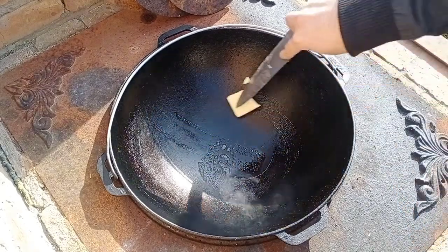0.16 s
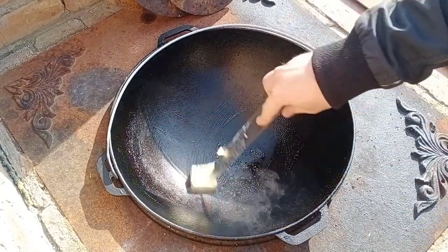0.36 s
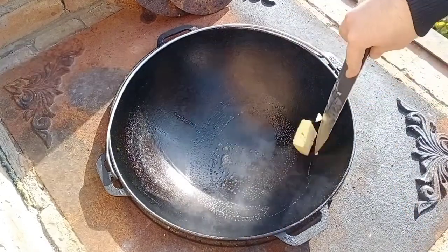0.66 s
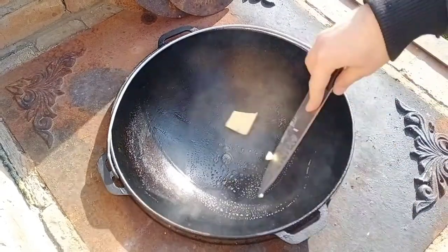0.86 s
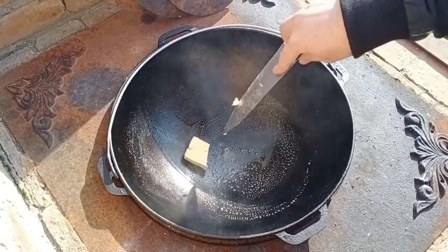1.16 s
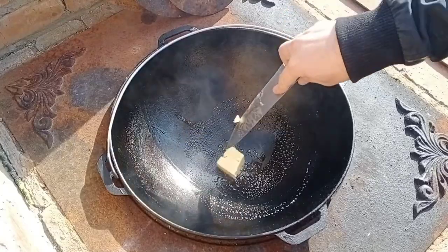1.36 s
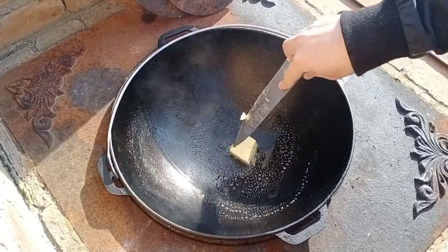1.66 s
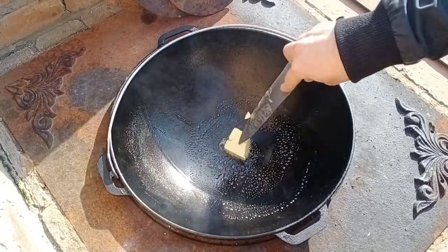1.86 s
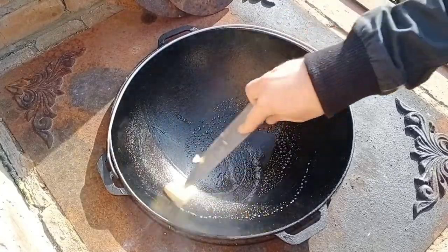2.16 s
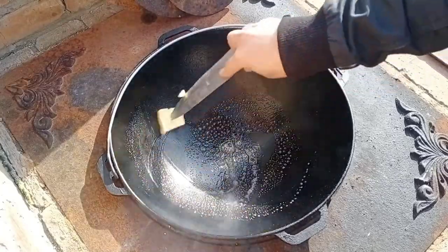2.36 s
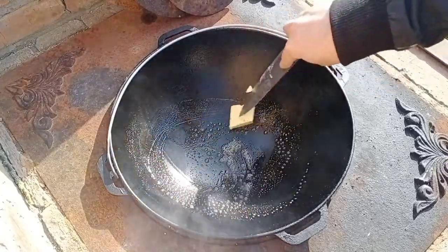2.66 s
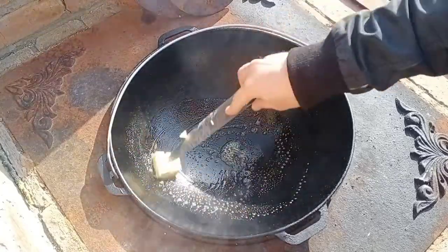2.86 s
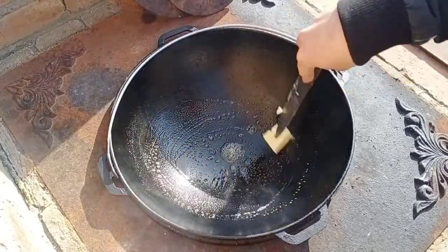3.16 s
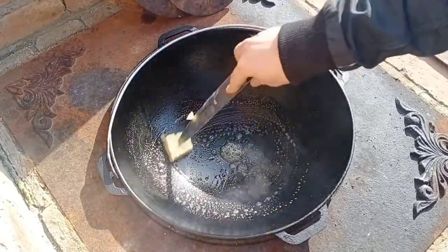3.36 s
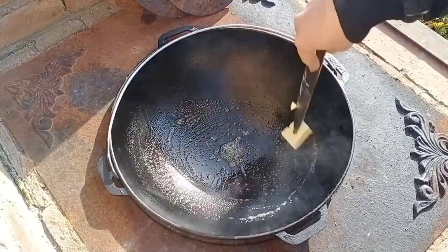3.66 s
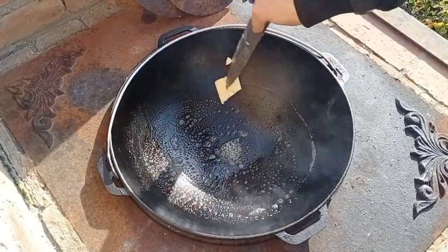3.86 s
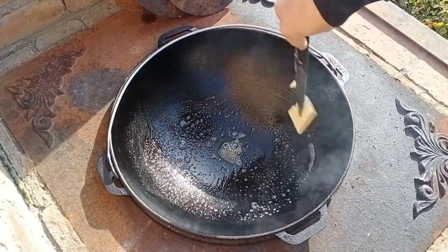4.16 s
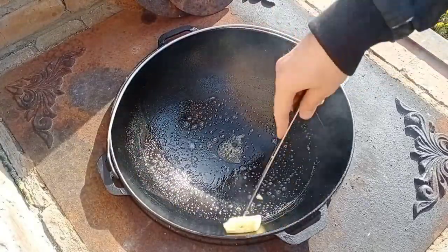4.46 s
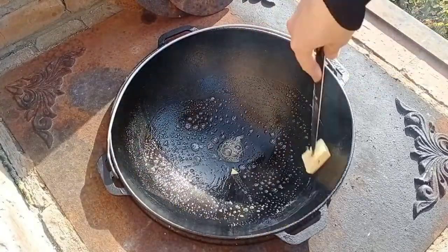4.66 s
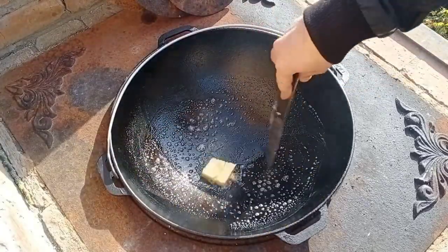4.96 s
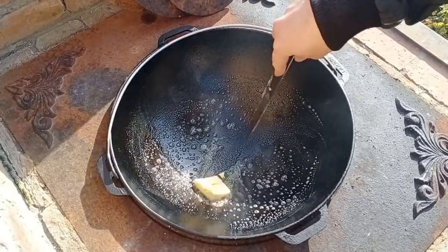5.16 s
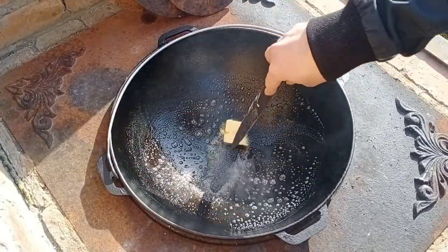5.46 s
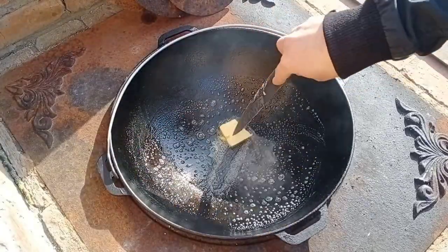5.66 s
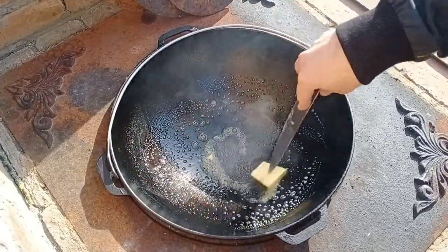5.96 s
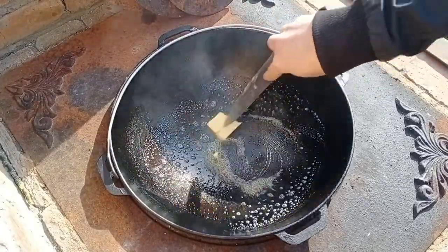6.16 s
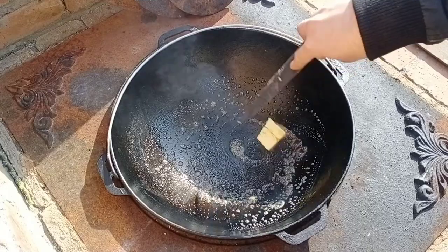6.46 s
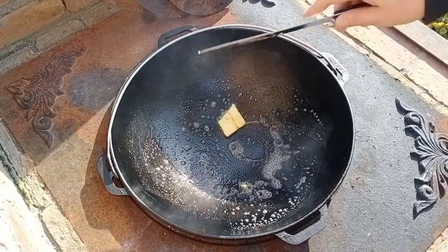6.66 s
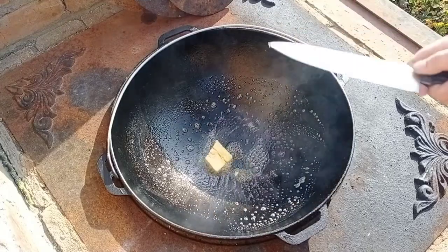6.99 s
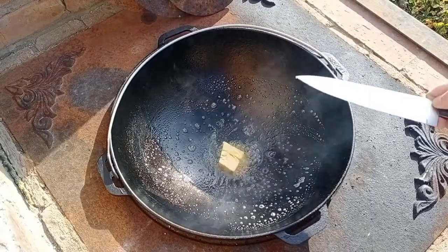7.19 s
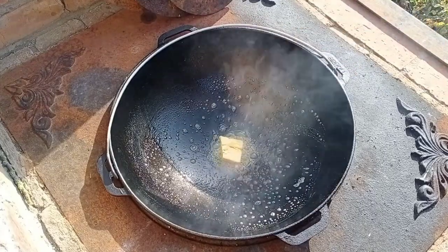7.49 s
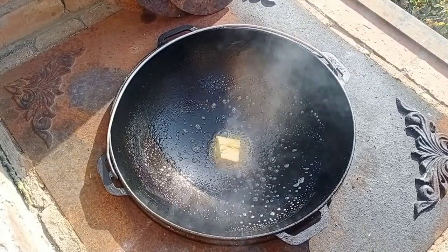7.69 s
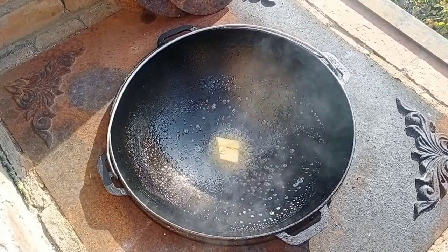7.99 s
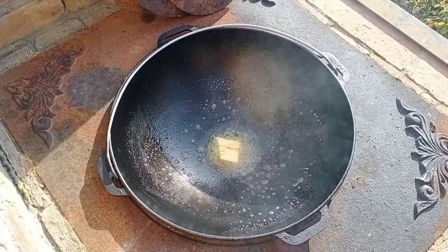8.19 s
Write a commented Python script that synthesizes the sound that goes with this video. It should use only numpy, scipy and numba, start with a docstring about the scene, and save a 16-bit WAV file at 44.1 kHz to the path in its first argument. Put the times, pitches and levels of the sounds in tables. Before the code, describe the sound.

Butter fizzes and spits sharply in a hot iron pot outdoors, flaring as a knife drags it, with light wind bumping the microphone.

```python
"""Outdoors, a slab of butter is pushed round a hot iron pot with a knife, close to a phone microphone.
Water in the butter boils off: a fizz of tiny random bursts and hiss, with louder spits made from clicks.
All but the deepest bubbling passes through echoes and resonances that stand for the bowl, or a colour filter.
The knife strikes the iron twice (noise driving ringing modes) and dragging makes the pot hum.
Filtered noise makes the wind that murmurs and thuds on the microphone, and a faint steady background.
"""
import sys
import numpy as np
from scipy import signal
from scipy.fft import rfft, irfft
from scipy.io import wavfile
from scipy.ndimage import uniform_filter1d
from numba import njit

SR = 44100
rng = np.random.default_rng(int(sys.argv[2]) if len(sys.argv) > 2 else 0)


def wav_out(sig):
    """Save sig, one row per channel (or a flat mono array), as 16-bit PCM at SR to the path in sys.argv[1]."""
    wavfile.write(sys.argv[1], SR, np.round(np.clip(np.atleast_2d(sig).T, -1, 1) * 32767).astype(np.int16))


N = 367353

# Tone of the faint outdoor background: (frequency [Hz], gain [dB])
AIR_TONE = [(18, -18), (30, 18), (108, -6), (591, -13.5), (785, 6), (1200, -23), (1300, 12), (1690, -23),
            (2860, -120)]
AIR_LEVEL_DB = -78

# Tone of the wind on the microphone: (frequency [Hz], gain [dB])
WIND_TONE = [(15, -9), (25, 1.5), (108, 5.5), (160, -4), (237, -9.5), (296, -20), (400, -32), (520, -65),
             (880, -120)]
# Murmur of the wind: (time [s], level [dB])
BREEZE = [(0, -74), (.47, -85), (.62, -63), (.85, -69), (1.02, -71), (1.2, -74), (1.65, -83), (1.8, -68.5),
          (2.5, -68.5), (3.2, -76), (3.65, -64.5), (4.0, -77), (4.44, -66.5), (4.75, -77), (5.0, -82),
          (5.12, -66), (5.6, -83), (6.5, -68.5), (7.5, -80), (8.33, -69)]
# Gusts that thud on the microphone: (time [s], level before the soft start [dB])
THUDS = [(2.164, -33.5), (2.8, -61), (4.396, -58), (5.753, -41), (5.883, -42.5), (6.079, -47.5),
         (6.288, -31), (6.577, -48), (6.673, -35), (6.72, -32.5), (7.234, -50.5), (8.09, -32), (8.199, -42)]
THUD_T60_S = 0.17  # time for a thud to die by 60 dB

# Low resonances of the pot: (frequency [Hz], width [Hz])
POT_HUM = [(425, 55), (730, 110), (1080, 86)]
# Levels of the two upper ones: (time [s], middle level [dB], top level [dB])
UPPER_HUM = [(0, -74, -70), (.5, -76, -70), (.65, -101, -57.5), (1.0, -77, -56.5), (1.3, -80, -73),
             (1.8, -78, -70), (2.3, -78, -66), (2.6, -83, -84.5), (3.4, -83, -76), (4.0, -79, -79),
             (4.44, -73, -83), (4.9, -79.5, -86), (5.6, -74.5, -88), (6.3, -84, -83), (6.54, -77, -68),
             (6.97, -65, -80), (7.1, -84.5, -83.5), (8.33, -87, -82.5)]
LOW_HUM_DB, LOW_HUM_SLOPE = -63, 1.33  # lowest one at the hardest boil; dB per dB of big bubbles

# Knife on iron: (time [s], ring [dB], skid length [s], brightness [dB per octave],
# thud [dB], thud pitch [Hz], knock [dB]); levels apply before the filters
STRIKES = [(0.904, -25.5, 0.0062, -5, -22.5, 134.6, -15), (5.066, -18, 0.059, 15, -28.5, 158.3, -42)]
# Ringing modes of the iron: (frequency [Hz], drive [dB], time to die by 60 dB [s])
IRON_MODES = [(2310, -21.5, 0.038), (2670, -8.5, 0.089), (3090, -3, 0.15), (3240, -7.5, 0.12),
              (3304, 3.5, 0.13), (3410, 6.5, 0.062), (3570, -8.5, .07), (3800, -6, 0.029),
              (3800, -12, 0.043), (4050, 5, 0.056), (4150, 4.5, 0.042), (4820, -6.5, 0.035),
              (4870, -13, .05), (5100, -3, 0.054), (5600, -4.5, 0.055), (6140, -24, .05)]

# Tone of bowl and microphone together: (frequency [Hz], gain [dB])
BOWL_TONE = [(530, -68.5), (950, -71.5), (1200, -24.5), (1480, -7), (1900, -11), (2300, -11.5), (3300, -4),
             (4380, -1), (5700, 0), (7140, -11.5), (9300, -29.5), (10300, -27.5), (11600, -27),
             (13500, -14), (15600, -12.5)]
# Echoes in the bowl: (delay [s], level [dB])
BOWL_ECHOES = [(.0011, -34.5), (.0027, -26.5), (.0043, -14.5), (.0068, -23)]
# Air resonances of the bowl: (frequency [Hz], width [Hz], level against the sound that drives them [dB])
BOWL_AIR = [(1620, 97, -16), (2580, 315, -1.5), (3190, 110, -3), (4110, 360, -3.5), (5540, 300, -7.5),
            (6640, 170, -12), (10100, 120, -8)]

# Loud single spits: (time [s], peak [dB], spray above peak [dB], thump above peak [dB])
SPITS = [(0.125, -20, -22, -20.5), (0.2254, -16, -13.5, -42), (0.385, -20, -27, -45), (0.6, -16, -19, -34),
         (0.7679, -19.5, -4.5, -31), (0.84, -19, -19, -24), (1.491, -18.5, -12, -33),
         (1.5457, -13.5, -18, -30), (1.668, -17.5, -13, -26), (1.8192, -12, -22, -32),
         (1.8519, -18.5, -16, -26), (1.9998, -22, -18, -30), (2.604, -15.5, -33, -27),
         (3.2857, -19.5, -10, -39), (3.3116, -21, -8, -30), (3.3518, -23, -5, -19.5),
         (3.496, -20.5, -11, -48), (3.6897, -13.5, -21, -33), (3.8689, -16.5, -22.5, -49),
         (4.594, -24.5, -13, -39), (4.8641, -21, -12, -42), (5.238, -16, -25, -37), (5.3596, -16, -17, -36),
         (5.455, -13.5, -19, -26), (5.5318, -14.5, -18, -22), (5.7021, -15, -23, -25),
         (6.094, -17.5, -15, -41), (6.1716, -18, -7.5, -26.5), (6.216, -16.5, -25, -36),
         (6.27, -18, -14, -27), (6.548, -10.5, -27, -28.5), (6.6146, -11, -15, -25.5),
         (6.7315, -13, -11, -36), (6.7755, -19, -13, -45), (7.111, -19.5, -25, -36),
         (7.1688, -16, -28, -42), (7.2406, -16.5, -18, -27), (7.4328, -18.5, -10, -33),
         (7.4576, -12, -19, -14), (7.5553, -22, -24, -25), (7.742, -17.5, -33, -31), (7.856, -22, -16, -45),
         (8.1874, -26.5, -36, -41), (8.2298, -23.5, -29, -39)]
SPIT_MAKEUP_DB = 8.7, 29.4, 38.1, 27  # makes up for filter loss in body, spray, thump and deep part
SPLIT_HZ = 2000, 9300  # borders between big bubbles, fizz and spray

# Gentle boil between the flares: (time [s], fizz [dB], fine spray [dB], big bubbles [dB])
SIMMER = [(0, -50, -53, -64), (.9, -56, -52, -60.5), (1.3, -57, -55, -66.5), (2.0, -51, -50, -62),
          (2.75, -45.5, -43.5, -64), (3.95, -48, -50, -67), (4.5, -52.5, -48.5, -63), (4.9, -50, -50, -68),
          (5.9, -53.5, -60, -74), (7.0, -45, -48, -56.5), (7.85, -47.5, -55, -62),
          (8.03, -56.5, -59.5, -67.5), (8.33, -53, -59, -83)]
# The slab slides onto fresh hot iron and the boil flares:
# (start [s], rise [s], hold [s], fizz [dB], fine spray [dB], big bubbles [dB])
FLARES = [(-.1, .1, .04, -35.5, -36.5, -50), (0.399, .14, 0.027, -38, -38.5, -49),
          (1.33, 0.26, 0.093, -40, -43, -53), (2.141, .11, 0.093, -35, -34, -46),
          (3.0, .15, .04, -38.5, -35, -50.5), (3.5, .11, 0.041, -38, -34, -49.5),
          (4.168, 0.043, 0.0091, -48, -48, -64), (5.04, .04, 0.039, -38, -36, -51),
          (5.14, .1, .42, -33.5, -35, -50), (6.023, .1, .15, -42, -44, -58.5),
          (6.3, .2, .08, -38, -34.5, -52), (6.671, .06, .08, -40, -37.5, -53.5)]
RISE_DB = 16  # climb of a flare over its rise time
FALL_DB_PER_S = 40, 36, 44.5  # how fast fizz, spray and big bubbles die down
# Brief dips in the level of the fizz, spray and big bubbles: (time [s], length [s], level change [dB])
DIPS = [(3.274, 0.037, -9), (3.335, .014, -7), (6.624, .05, -5)]

MIC_TOP_HZ = 15900  # the top is cut above this


def undb(db):
    """Decibels to a plain factor."""
    return 10 ** (np.asarray(db) / 20)


def unit(x):
    """Scale to an average (RMS) strength of 1."""
    return x / np.sqrt(np.mean(x ** 2))


def curves(table):
    """Columns of a table joined by straight lines in time."""
    s, *columns = np.transpose(table)
    return [np.interp(np.arange(N) / SR, s, column) for column in columns]


def colour(x, points, size=2048):
    """Tone filter through (Hz, dB) points that never sounds ahead of its input."""
    hz, db = np.transpose(points)
    bins_hz = np.arange(size // 2 + 1) * SR / size
    log_gain = np.interp(np.log(bins_hz + 1), np.log(hz), db) * np.log(10) / 20
    cepstrum = irfft(log_gain)
    # folding the second half onto the first makes the filter minimum-phase
    cepstrum[1:size // 2] *= 2
    cepstrum[size // 2 + 1:] = 0
    impulse = irfft(np.exp(rfft(cepstrum)))
    return signal.fftconvolve(x, impulse)[:N]


def band(x, lo_hz, hi_hz):
    """Keep mainly the sound between two frequencies."""
    return signal.sosfilt(signal.butter(2, [lo_hz, hi_hz], "band", fs=SR, output="sos"), x)


def ring(x, hz, t60):
    """One mode: a decaying rotation driven by x; its real part is in step with x at resonance."""
    pole = np.exp(2j * np.pi * hz / SR - np.log(1000) / (t60 * SR))
    return signal.lfilter([1], [1, -pole], x)


def width_to_t60(width):
    """A narrower resonance [Hz] rings longer [s]."""
    return np.log(1000) / np.pi / width


def walk(rate):
    """Random levels, a new one every 1 / rate seconds, smoothed twice; RMS strength 1."""
    k = int(SR / rate)
    steps = np.repeat(rng.standard_normal(N // k + 1), k)
    smooth = uniform_filter1d(uniform_filter1d(steps, k), k)
    return unit(smooth[:N])


@njit
def follow(x, attack, release):
    """Envelope that rises fast and falls slowly."""
    e, out = 0., np.empty(len(x))
    for i in range(len(x)):
        e += (x[i] - e) * (attack if x[i] > e else release)
        out[i] = e
    return out


def split(x):
    """Low, middle and high parts that add up to x."""
    low, below_high = (signal.sosfiltfilt(signal.butter(2, hz, fs=SR, output="sos"), x) for hz in SPLIT_HZ)
    return low, below_high - low, x - below_high


def air():
    """Faint steady outdoor background: noise with a fixed tone."""
    return undb(AIR_LEVEL_DB) * unit(colour(rng.standard_normal(N), AIR_TONE, size=8192))


def wind():
    """Wind murmurs on the microphone and thuds in gusts: one low noise with a changing level."""
    t = np.arange(N) / SR
    level = undb(curves(BREEZE)[0] + 6.2 * walk(26.0))
    for s, db in THUDS:
        age = np.maximum(t - s, 0)
        soft_start = 1 - np.exp(-age / 0.013)
        level = level + soft_start * undb(db - 60 * age / THUD_T60_S)
    return level * unit(colour(rng.standard_normal(N), WIND_TONE, size=8192))


def drag(big_db):
    """Dragging rumbles the pot's low resonances; the lowest follows the level of the big bubbles."""
    low_db = LOW_HUM_DB + LOW_HUM_SLOPE * (big_db - big_db.max())
    judder_db = 4.5  # random wavering of each level
    rumble = 0
    for (hz, width), db in zip(POT_HUM, [low_db, *curves(UPPER_HUM)]):
        hum = ring(rng.standard_normal(N), hz, width_to_t60(width)).imag
        rumble = rumble + undb(db + judder_db * walk(12.)) * unit(hum)
    return rumble


def knife():
    """The edge strikes or skids: it knocks, rings the iron and grates; the pot thuds on its stand."""
    t, out = np.arange(N) / SR, 0
    for s, ring_db, skid_s, bright_db, thud_db, thud_hz, knock_db in STRIKES:
        age = np.maximum(t - s, 0)

        def noise_with(fade):
            return (t >= s) * fade * rng.standard_normal(N)

        skid = noise_with(np.exp(-(age / skid_s) ** 2)) / np.sqrt(skid_s * SR)
        middle_hz = IRON_MODES[5][0]  # brightness tilts the modes around this pitch
        iron = sum(undb(db + bright_db * np.log2(hz / middle_hz)) * ring(skid, hz, t60).imag
                   for hz, db, t60 in IRON_MODES)
        grating = undb(38.5) * colour(skid, BOWL_TONE)
        out = out + undb(ring_db) * band(iron + grating, 1880.0, 4840.0)

        shove = age / 0.00095 * np.exp(-age / 0.00055) / (0.00095 * SR)
        thud = ring(shove, thud_hz, 0.12) + undb(0.5) * ring(shove, POT_HUM[0][0], 0.15)
        out = out + undb(thud_db) * band(thud.imag, 100.0, 700.)

        knock = noise_with(np.exp(-age / 0.0043))
        out = out + undb(knock_db) * band(knock, 470.0, 1900.0)

        shudder = noise_with(undb(-60 * age / 0.39))  # the pot shakes on its stand
        out = out + undb(thud_db + 5.0) * band(shudder, 0.64 * thud_hz, 1.58 * thud_hz)

        rattle = noise_with(np.exp(-age / 0.021))  # modes too close to tell apart
        rattle = band(band(rattle, 3000.0, 4360.0), 3000.0, 4360.0)
        out = out + undb(ring_db + 5.5 - 0.55 * bright_db) * rattle
    return out


def bowl(x):
    """Direct sound, a few echoes off the curved iron and the air ringing in it."""
    echoed = x.copy()
    for s, db in BOWL_ECHOES:
        delay = int(s * SR)
        echoed[delay:] += undb(db) * x[:-delay]
    out = echoed
    for hz, width, db in BOWL_AIR:
        even_out = 2 * np.pi * width / SR  # cancels the build-up at resonance
        out = out + undb(db) * even_out * ring(echoed, hz, width_to_t60(width)).real
    return out


def sputter(clicks, tail_s, tail_db):
    """Each click is followed by a noisy swell of after-bursts that dies away."""
    fade = np.exp(-1 / (tail_s * SR))
    swell = signal.lfilter([np.e * (1 - fade)], np.convolve([1, -fade], [1, -fade]), np.abs(clicks))
    return clicks + undb(tail_db) * swell * rng.standard_normal(N)


def spits():
    """Each spit is a sharp click and a sputter, with its own share of spray and thump."""
    s, peak_db, spray_db, thump_db = np.transpose(SPITS)
    body_up, spray_up, thump_up, deep_up = SPIT_MAKEUP_DB

    def snap(db):
        click = np.zeros(N)
        click[(s * SR).astype(int)] = undb(db)
        return sputter(click, tail_s=0.00085, tail_db=-11.0)

    body = split(colour(bowl(snap(peak_db + body_up)), BOWL_TONE))[1]
    spray = split(colour(snap(peak_db + spray_db + spray_up), BOWL_TONE))[2]
    thump = split(colour(snap(peak_db + thump_db + thump_up), BOWL_TONE))[0]
    # only the biggest bubbles reach this low
    deep = band(snap(peak_db + 2 * thump_db + deep_up), 400.0, 1100.0)
    return body + spray + thump + deep


@njit
def grains(count, start, hz, cycles, size):
    """Damped bubble tones, each dying to 1 / e in its number of cycles."""
    out = np.zeros(count)
    for k in range(len(start)):
        w = 2 * np.pi * hz[k] / SR
        turn = np.exp(1j * w - hz[k] / SR / cycles[k])
        z = size[k] + 0j
        for i in range(start[k], min(count, start[k] + int(6 * cycles[k] * SR / hz[k]))):
            out[i] += z.real
            z *= turn
    return out


def bursts(per_s, spread_db, cycles, lo_hz, hi_hz):
    """Bubbles bursting at random moments: many small, few large, any pitch in the range."""
    chance = rng.random((N, 3))
    at = np.flatnonzero(chance[:, 0] < per_s / SR)
    hz = lo_hz + (hi_hz - lo_hz) * chance[at, 1]
    size = undb(-spread_db * np.log(1 - chance[at, 2])) * np.sqrt(hz / cycles)
    sign = rng.choice([-1., 1.], len(at))
    return unit(grains(N, at, hz, cycles + 0 * hz, size * sign))


def boiling():
    """Levels in dB of fizz, spray and big bubbles: flares rise, hold and die down over the simmer."""
    t = np.arange(N) / SR
    power = undb(np.array(curves(SIMMER))) ** 2
    for s, rise_s, hold_s, *peak_db in FLARES:
        climb_db = RISE_DB * np.minimum((t - s) / rise_s - 1, 0)
        after_s = np.maximum(t - s - rise_s - hold_s, 0)
        flare_db = np.c_[peak_db] + climb_db - np.outer(FALL_DB_PER_S, after_s)
        power = power + undb(flare_db) ** 2
    dip_db = sum(db * ((t > s) & (t < s + length_s)) for s, length_s, db in DIPS)
    return 10 * np.log10(power) + uniform_filter1d(dip_db, size=200)


def fizz(level_db, spray_db, big_db):
    """A hiss of countless bursts, crackle, ringing bubbles and pops; a harder boil packs them closer."""
    boil = undb(.6 * (level_db - level_db.max()))
    density = undb(4.0 * walk(60.))  # the density of bursts wanders at random
    mist_db = spray_db - level_db  # little fine spray leaves little hiss between the bursts
    mist_db = mist_db - mist_db.mean()

    hiss = undb(0.87 * walk(25.) + 0.52 * mist_db) * rng.standard_normal(N)
    crackle = bursts(2500. * boil * density, spread_db=2.5, cycles=0.29, lo_hz=1000., hi_hz=17400.0)
    bubbles = bursts(900. * boil * density, spread_db=1.5, cycles=2.4, lo_hz=1124.0, hi_hz=16250.0)
    pops = bursts(300. * boil, spread_db=2.0, cycles=0.75, lo_hz=1420.0, hi_hz=8850.0)
    pops = unit(sputter(pops, tail_s=0.00098, tail_db=-19.0))
    pops = undb(-4.5 - 0.53 * mist_db) * pops / boil ** 0.32

    # sparse bursts must each be louder for the same level
    sparse = (undb(-3.5) * crackle + undb(-8.0) * bubbles + pops) / np.sqrt(boil)
    mix = colour(bowl(undb(-3.5) * hiss + sparse), BOWL_TONE)

    # a near-wall echo whose delay wanders at random, as for a moving slab; the colour drifts with it
    lag = SR * (0.000811 + .00012 * walk(1.5))
    wall_echo = np.interp(np.arange(N) - lag, np.arange(N), mix)
    big, body, spray = split(mix + undb(-10.5) * wall_echo)
    return undb(level_db) * unit(body) + undb(spray_db) * unit(spray) + undb(big_db) * unit(big)


def scene():
    """Add all layers, from the background to the boiling butter; both channels are the same."""
    fizz_db, spray_db, big_db = boiling()
    background = air() + wind()
    mono = background + drag(big_db) + knife() + spits() + fizz(fizz_db, spray_db, big_db)
    return np.array([mono, mono])


def record(dry):
    """The microphone loses the deep bass; gain control ducks after loud peaks; the top is cut."""
    dry = signal.sosfilt(signal.butter(3, 60., "high", fs=SR, output="sos"), dry)
    attack_s, release_s = 0.0016, 0.038
    peak = follow(np.abs(dry[0]), 1 / (attack_s * SR), 1 / (release_s * SR))
    gain = np.minimum(1, undb(-21.0) / (peak + 1e-9)) ** 0.28  # turns down only above -21 dB
    return signal.sosfilt(signal.ellip(10, .2, 70, MIC_TOP_HZ, fs=SR, output="sos"), dry * gain)


dry = scene()
out = record(dry)
wav_out(out)
```